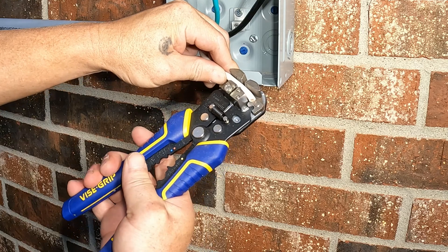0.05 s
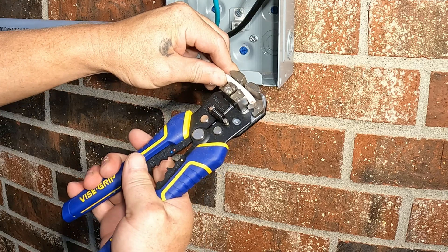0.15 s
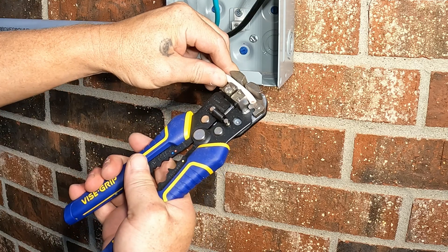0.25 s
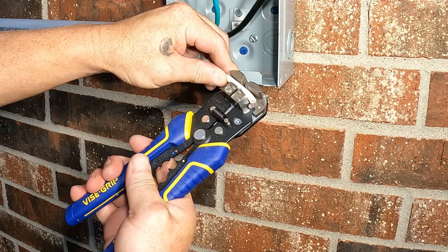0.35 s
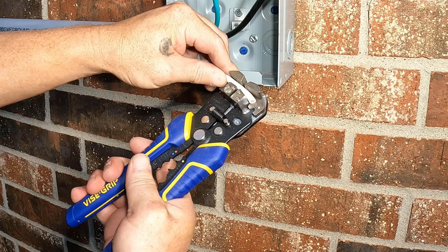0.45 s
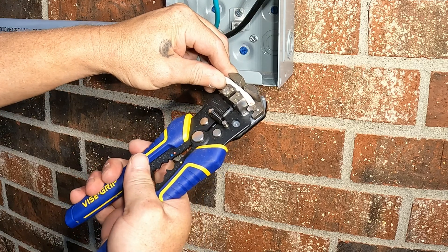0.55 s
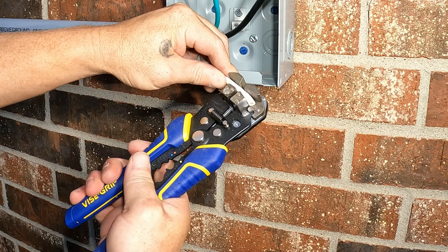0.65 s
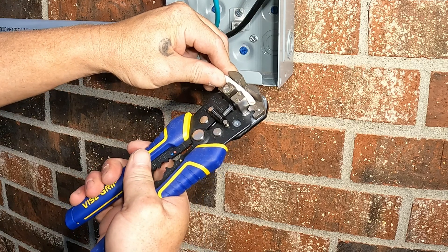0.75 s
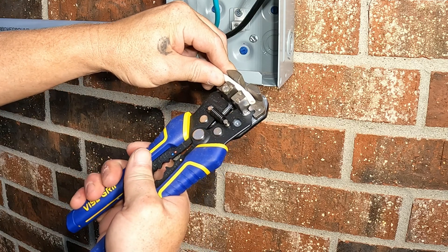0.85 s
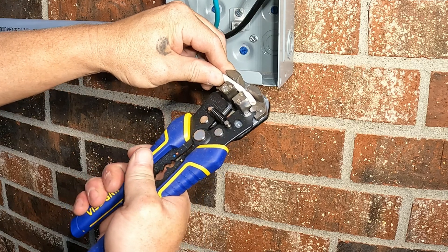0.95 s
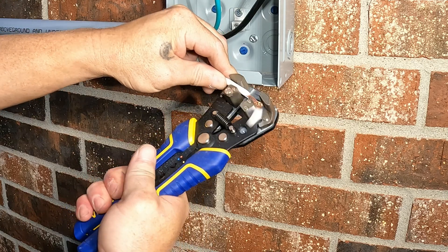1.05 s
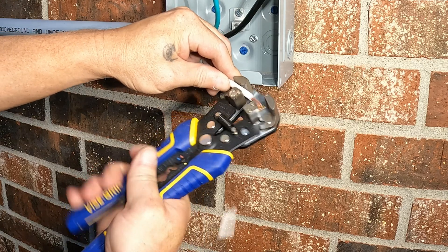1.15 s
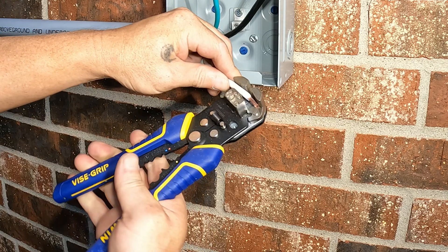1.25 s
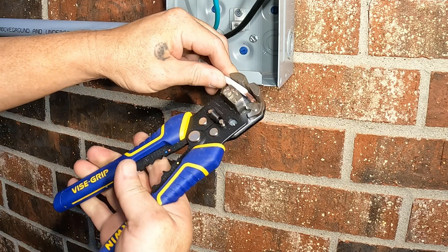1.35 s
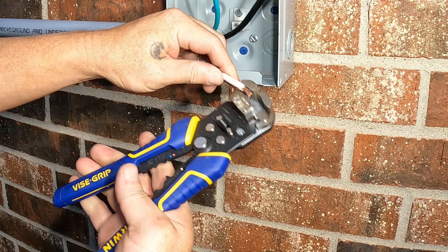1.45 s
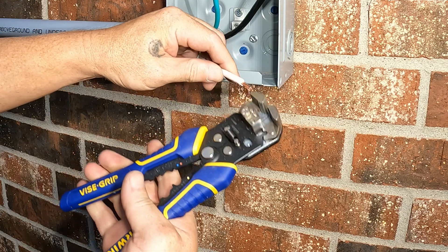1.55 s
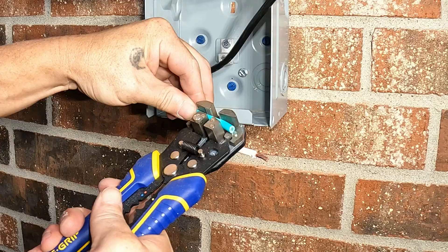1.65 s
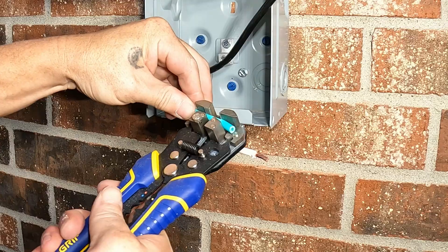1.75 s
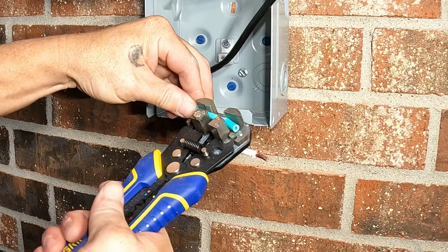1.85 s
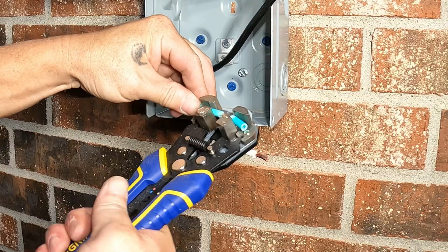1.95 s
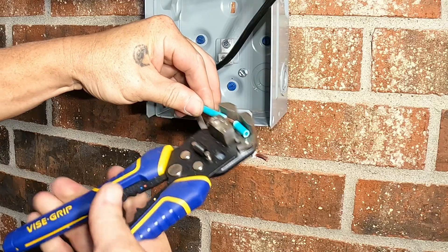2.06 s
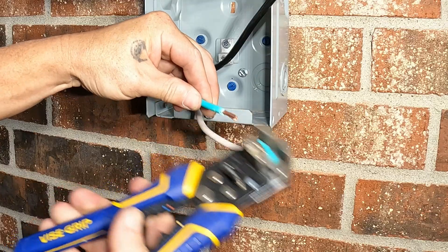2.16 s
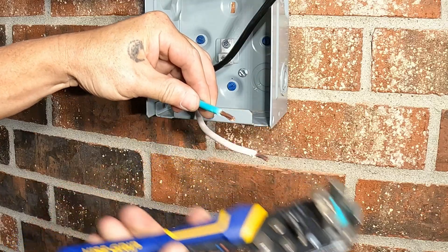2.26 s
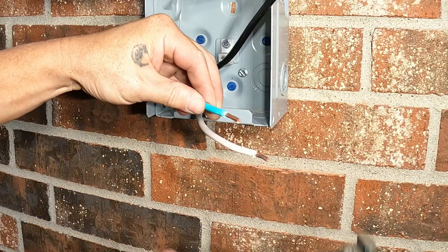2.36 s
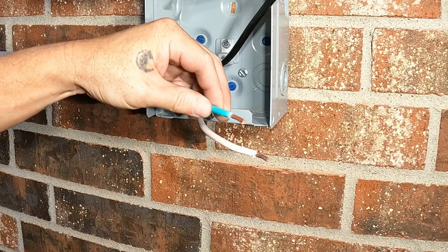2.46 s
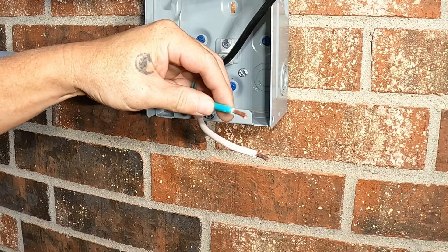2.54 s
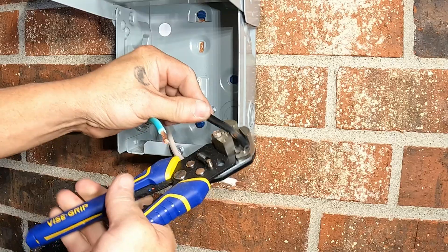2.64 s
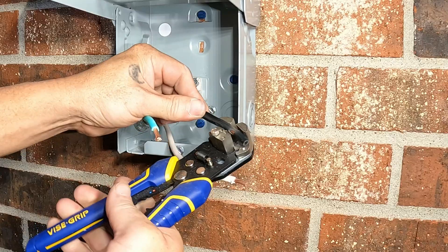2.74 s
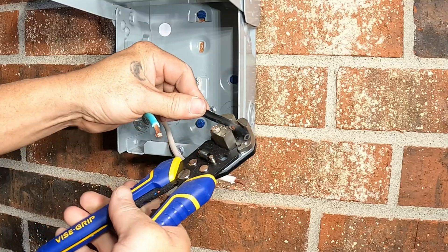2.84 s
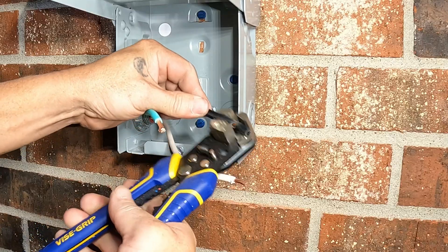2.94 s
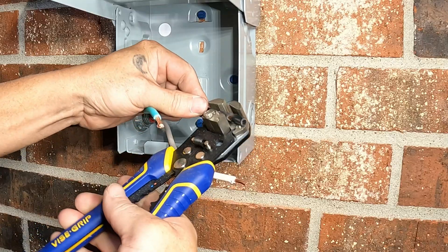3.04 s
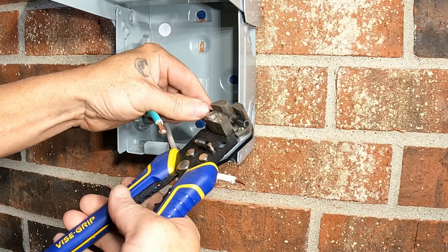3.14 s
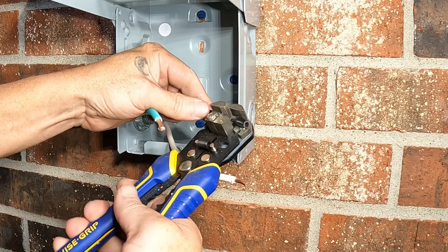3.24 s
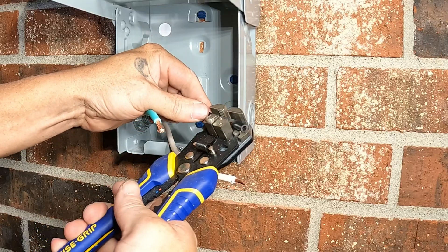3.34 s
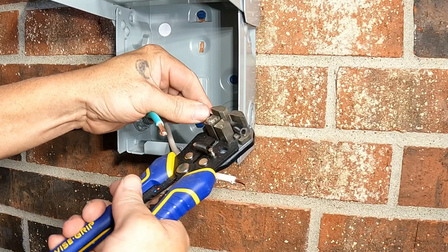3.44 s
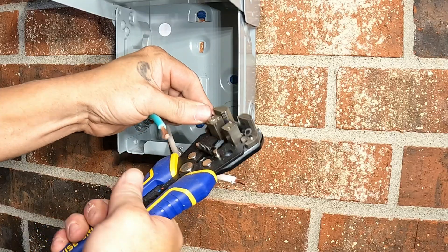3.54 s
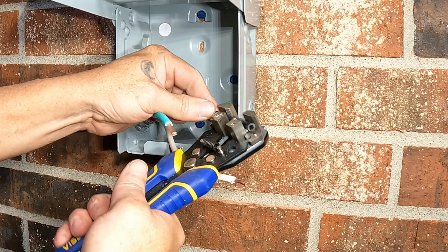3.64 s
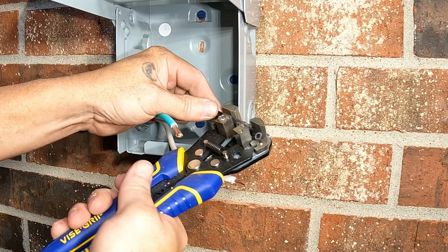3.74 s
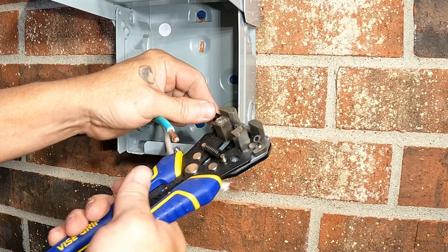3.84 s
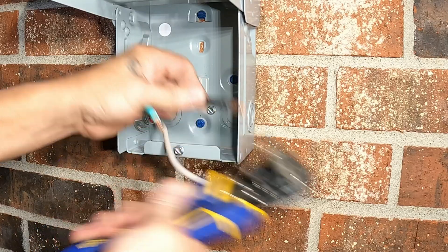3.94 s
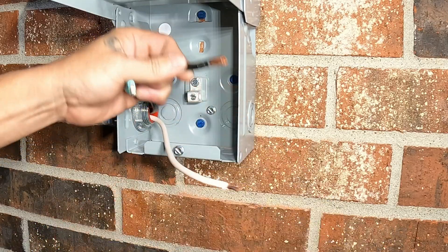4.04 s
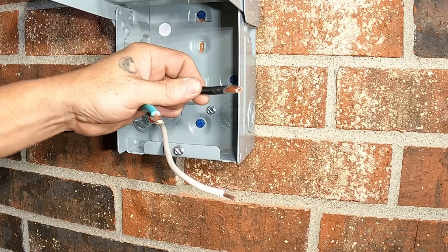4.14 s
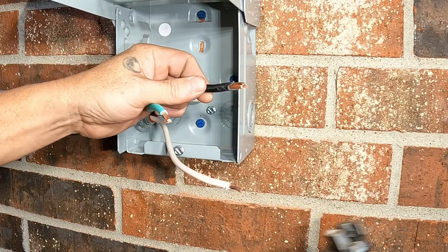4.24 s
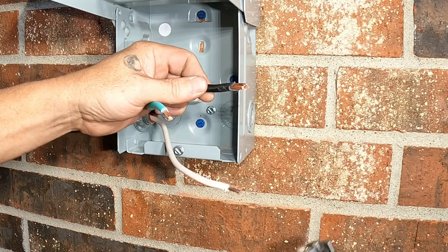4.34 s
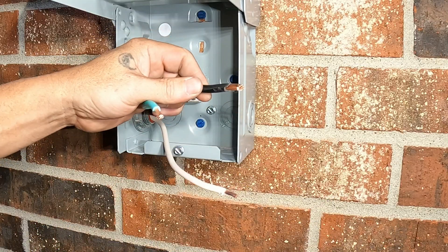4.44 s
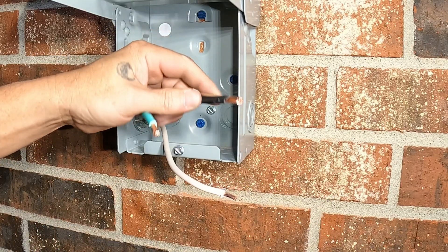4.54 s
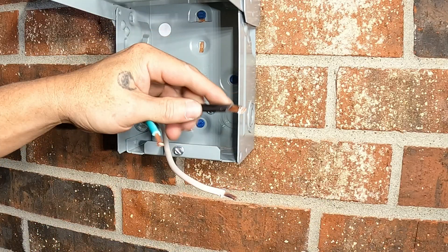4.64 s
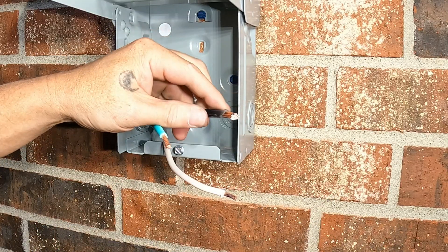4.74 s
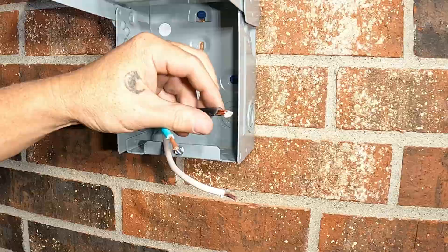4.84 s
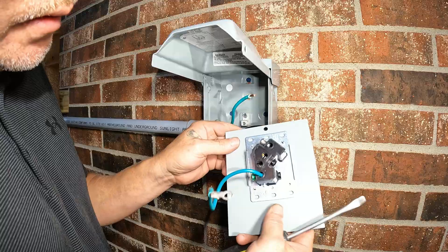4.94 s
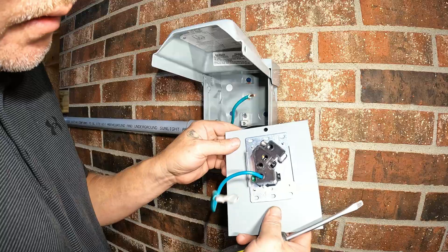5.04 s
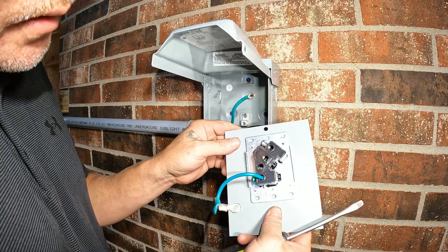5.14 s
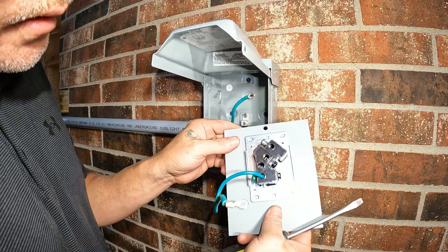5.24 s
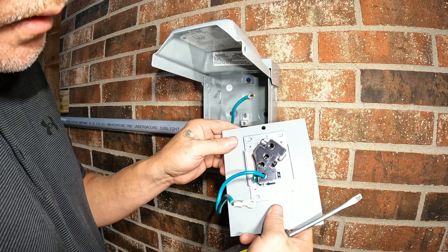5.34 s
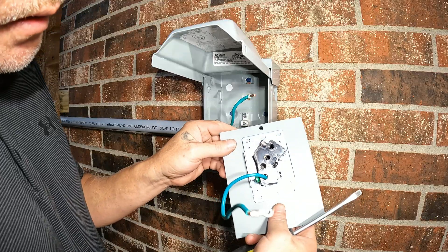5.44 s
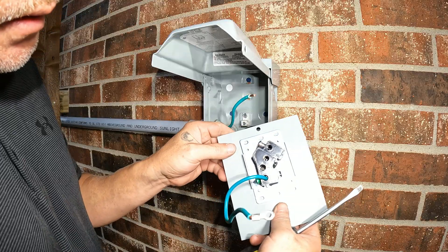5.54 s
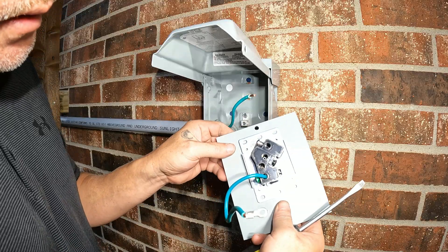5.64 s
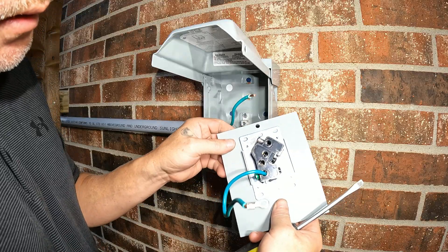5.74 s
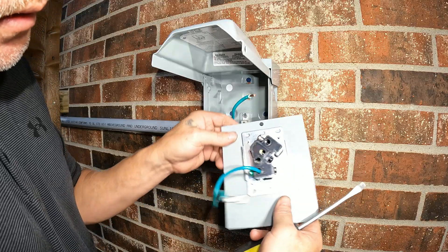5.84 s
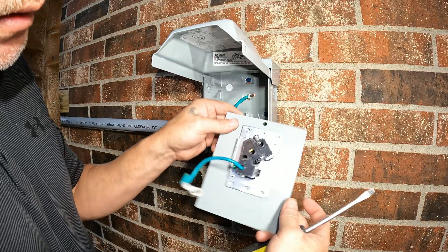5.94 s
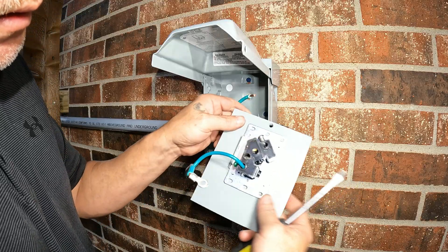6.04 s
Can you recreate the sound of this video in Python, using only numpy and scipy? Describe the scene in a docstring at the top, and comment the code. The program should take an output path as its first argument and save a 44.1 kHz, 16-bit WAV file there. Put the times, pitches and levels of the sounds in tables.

```python
"""Over low outdoor rumble and faint hiss, a wire stripper works close by at a steel box on a brick wall.
After a light click, two hard snaps and thumps tear insulation; after each, the sprung jaws clack and rattle.
Stiff wire knocks on the box and rubs; a third, much softer snap comes with a strong thump and thin whistle.
More clacks and knocks follow, then fingers rustle on the wire and a cover plate clinks.
Shaped noise makes the air, bursts ringing through resonances the blows, and sine waves the lasting tones."""
import sys
import numpy as np
from scipy import signal
from scipy.fft import rfft, irfft
from scipy.io import wavfile
from scipy.ndimage import uniform_filter1d

SR = 44100
rng = np.random.default_rng(int(sys.argv[2]) if len(sys.argv) > 2 else 0)


def master(y):
    """Save y as 16-bit WAV."""
    cut = np.clip(np.atleast_2d(y).T, -1, 1)
    pcm = np.round(cut * 32767)  # scale
    wavfile.write(sys.argv[1], SR, pcm.astype(np.int16))


N = 268701

# resonances of the free jaws, before each blow's bands are set: (f/Hz, width/Hz, level/dB)
FREE_JAWS = [(1330, 140, -6), (2130, 130, -9), (2620, 520, -4), (3530, 790, -8), (4912, 710, -1),
             (5930, 1900, 1), (6990, 520, 3), (8200, 270, -26), (10900, 2700, -16.5), (10833, 2700, -11.5)]


def amp(db):
    """Turns decibels into gain."""
    return 10 ** (np.asarray(db) / 20)


def evened(x):
    """Scales a sound to an average strength (rms) of 1."""
    return x / np.sqrt(np.mean(x ** 2) + 1e-20)


def read(points, hz):
    """Reads a table between its points, with frequency on a log axis."""
    f, value = np.transpose(points)
    return np.interp(np.log(hz + 1), np.log(f + 1), value)


def curve(rows):
    """Reads a table of times and values at every sample."""
    return np.interp(np.arange(N) / SR, *np.transpose(rows))


def add(mix, s, sound):
    """Mixes a sound in at time s, cutting off what runs past the end."""
    start = max(round(s * SR), 0)
    part = mix[..., start:][..., :sound.shape[-1]]
    part += sound[..., :part.shape[-1]]


def ring(x, modes):
    """Passes x through resonances side by side: the narrower one is, the longer it rings."""
    total = 0
    for hz, width, db in modes:
        b, a = signal.iirpeak(hz, hz / width, SR)
        total = total + amp(db) * signal.lfilter(b, a, x)
    return total


def pair(mid, side, side_db):
    """Makes left and right from a shared part and an opposed part."""
    opposed = amp(side_db) * side
    return np.array([mid + opposed, mid - opposed])


def noise(spectrum, side_db, top_hz):
    """Makes stereo noise of rms 1 with a given spectrum and a steep upper edge."""
    hz = np.fft.rfftfreq(N, 1 / SR)
    shape = amp(read(spectrum, hz)) / np.hypot(1, (hz / top_hz) ** 50)
    mid, side = irfft(rfft(rng.standard_normal((2, N))) * shape, N)
    return evened(pair(mid, side, side_db))


def slips(per_s):
    """Makes two random trains of tiny impacts."""
    return rng.standard_normal((2, N)) * (rng.random((2, N)) < per_s / SR)


def swell(s, hold_s, rise_db_per_s, fall_db_per_s):
    """Gives the gain of one stroke: it rises until time s, holds, and dies away."""
    t = np.arange(N) / SR - s
    rise_db = -rise_db_per_s * np.maximum(-t, 0)
    fall_db = -fall_db_per_s * np.maximum(t - hold_s, 0)
    return amp(rise_db + fall_db)


def voiced(x, levels_db):
    """Tilts a blow smoothly, in two passes, to bring its four bands close to the given strengths."""
    # edges of the bands thud, body, ring and top: (f/Hz)
    edges = np.array([400, 1600, 3400, 8200, 16000])
    centres = np.sqrt(edges[1:] * edges[:-1])
    z, hz = rfft(x), np.fft.rfftfreq(len(x), 1 / SR)
    for _ in range(2):
        energy = np.histogram(hz, edges, weights=abs(z) ** 2)[0]
        power = energy * 2 / (len(x) * .005 * SR)  # as if spread over 5 ms
        missing_db = levels_db - 10 * np.log10(power + 1e-20)
        z = z * amp(read(np.c_[centres, missing_db], hz))
    return irfft(z, len(x))


def blows(rows, modes, thud_db, top_db, crack_db, after_db, after_s, side_db, top_hz):
    """Makes each blow a brief clatter of tiny impacts that cracks and rings the metal."""
    thud_growth = .43  # dB of thud per dB of level: the thud grows slowly, so hard blows sound brighter
    out, t = np.zeros((2, N)), np.arange(-512, 3584) / SR
    hard = signal.butter(6, top_hz, fs=SR)
    soft = signal.butter(3, 8000, fs=SR)
    for s, db, body_db, clatter_ms in rows:
        impacts = rng.standard_normal((2, len(t))) * (t >= 0)
        # hard contact ends quickly; loose parts buzz on, duller
        fade = np.exp(-(1000 * t / clatter_ms / 1.5) ** 2)
        contact = signal.lfilter(*hard, impacts * fade)
        buzz = signal.lfilter(*soft, impacts * amp(after_db) * np.exp(-abs(t) / after_s))
        metal = ring(contact + buzz, modes) + amp(crack_db) * contact
        bands_db = np.array([thud_db + thud_growth * db, db + body_db, db, db + top_db])
        mid, side = [voiced(m, bands_db) for m in metal]
        add(out, s + t[0], pair(mid, side, side_db) * signal.windows.tukey(len(t), .2))
    return out


def hiss():
    """Makes the faint, even hiss of the microphone from noise."""
    return amp(-84) * noise([(100, 0.5), (10000, -0.5), (16000, -9)], side_db=-3, top_hz=13500)


def outdoors(rumble_db, air_db):
    """Makes a swelling low rumble under thin air noise whose level and colour change abruptly twice."""
    # rumble before rumble_db is added: (t/s, level/dB)
    rumble_level = [(0, -42), (1.5, -43.5), (1.97, -38), (2.27, -45.5), (2.8, -42.5), (3.3, -51),
                    (3.7, -42), (4.6, -47), (5.15, -38), (6.09, -39.5)]
    # relative spectrum of the rumble: (f/Hz, density/dB per Hz)
    rumble_spectrum = [(8.8, -38), (15, -5.5), (43, 1.5), (60, 3), (162, -11), (190, -14.5), (362, -23.5),
                       (432, -23), (541, -35.5), (596, -27.5), (700, -34), (910, -63.5), (1540, -120)]
    # air before air_db is added: (start/s, level/dB, relative spectrum as (f/Hz, density/dB per Hz))
    airs = [(0, -60.5, [(250, -18), (420, -3.5), (650, -16), (1150, -9), (1600, -15), (2400, -21.5),
            (4800, -22.5), (6500, -30), (8000, -33), (8700, -26), (9900, -29)]), (2.647, -62.5, [(250, -27),
            (420, -7.5), (850, -9.5), (1250, -7.5), (2000, -18.5), (3200, -17.5), (4000, -20),
            (5100, -13.5), (6200, -23.5), (8000, -27), (9900, -24.5)]), (4.985, -60, [(250, -22),
            (420, -9.5), (800, -12), (1400, -10), (2400, -20.5), (4000, -25), (5600, -20.5), (8000, -35.5),
            (9600, -28.5), (9900, -29.5)])]
    air, t = np.zeros((2, N)), np.arange(N) / SR
    for start, db, spectrum in airs:
        new_air = amp(db + air_db) * noise(spectrum, side_db=-4.5, top_hz=9950)
        air = np.where(t >= start, new_air, air)
    rumble = noise(rumble_spectrum, side_db=-20, top_hz=900)
    return air + amp(curve(rumble_level) + rumble_db) * rumble


def porch(x, wall_db, tail_db, far_db, far_s, far_width_s):
    """Scatters sound quickly off the brick wall, then adds a weak tail that swells as far walls answer."""
    # how long the tail takes to fall by 60 dB, apart from the swell: (f/Hz, t60/s)
    fall_times = [(300, .35), (1500, 0.36), (5000, 0.93), (8000, 0.12), (13000, .25)]
    t = np.arange(SR) / SR
    taps = rng.standard_normal((2, SR)) * (rng.random((2, SR)) < .1) * (t > .003)
    hz, age, z = signal.stft(taps, SR, nperseg=256)
    faded = z * amp(-60 * age / read(fall_times, hz)[:, None])
    tail = signal.istft(faded, SR)[1][:, :SR]
    tail = tail * (1 + amp(far_db) * np.exp(-((t - far_s) / far_width_s) ** 2))
    scatter = evened(taps * np.exp(-t / 0.013))
    echoes = amp(wall_db) * scatter + amp(tail_db) * evened(tail)
    return signal.fftconvolve(x, echoes / np.sqrt(SR), axes=1)[:, :N]


def fingers(grains_per_s):
    """Lets skin catch on the insulation in small dry grains of filtered noise."""
    # rustles on the wire: (full force at t/s, hold/s, level/dB)
    rustles = [(4.765, 0.081, -64), (5.03, .07, -61.5)]
    band = signal.butter(2, [900, 7000], "band", fs=SR)
    grains = signal.lfilter(*band, slips(grains_per_s))
    touch = np.zeros(N)
    for s, hold_s, db in rustles:
        touch += amp(db) * swell(s, hold_s, rise_db_per_s=119, fall_db_per_s=299.5)
    return touch * evened(pair(*grains, side_db=-9))


def plate():
    """Clinks the handled cover plate: small impacts ring its resonances."""
    # clinks: (t/s, level/dB, body relative to level/dB, clatter/ms before blows stretches it 1.5 times)
    clinks = [(5.085, -54.5, -17, 10.3), (5.986, -49, 6, 3.7), (6.0018, -36.5, 6.5, 2),
              (6.0105, -28.5, -4.5, 4.4), (6.019, -28.5, -24, 5.4)]
    # resonances of the plate, before each blow's bands are set: (f/Hz, width/Hz, level/dB)
    plate_modes = [(1428, 71, 7.5), (1680, 97, 1), (2055, 115, -9), (2520, 42.5, -8), (4220, 265, -17),
                   (4920, 350, -10.5), (6710, 230, 5), (7040, 99, 4)]
    return blows(clinks, plate_modes, thud_db=-27.5, top_db=-17, crack_db=-15, after_db=0,
                 after_s=0.011, side_db=-11, top_hz=12800)


def rub(slips_per_s):
    """Rubs strained wire in the box: dense uneven slips ring a few low resonances."""
    # strokes: (full force at t/s, hold/s, level/dB, level of the deep resonances/dB)
    rubs = [(3.099, 0.077, -54.5, -50.5), (3.355, 0.056, -39.5, -54)]
    # upper resonances, later scaled together: (f/Hz, width/Hz, level/dB)
    upper_modes = [(677, 102, 14.5), (841, 140, -19), (1210, 45, 11.5), (1334, 160, -22.5)]
    # deep resonances, later scaled together: (f/Hz, width/Hz, level/dB)
    deep_modes = [(431, 46, 7.5), (494, 110, -12.5)]
    band = signal.butter(3, [340, 1700], "band", fs=SR)
    force = signal.lfilter(*band, slips(slips_per_s))
    body, deep = evened(ring(force, upper_modes)), evened(ring(force, deep_modes))
    strokes = np.zeros((2, N))
    for s, hold_s, db, deep_db in rubs:
        gain = swell(s, hold_s, rise_db_per_s=334, fall_db_per_s=209)
        strokes += gain * (amp(db) * body + amp(deep_db) * deep)
    return pair(*strokes, side_db=-8.5)


def box(knock_db, scrape_s, rasp_db, top_hz):
    """Knocks and scrapes wire ends briefly on the sheet steel, weaker at each bounce."""
    # knocks: (t/s, level of the first contact before knock_db is added/dB, number of contacts)
    knocks = [(2.718, -38.5, 1), (2.741, -24.5, 2), (2.785, -27.5, 2), (3.688, -28, 1), (4.115, -17.5, 4),
              (4.244, -20, 3), (4.31, -26.5, 1)]
    # resonances of the steel box, later scaled together: (f/Hz, width/Hz, level/dB)
    box_modes = [(566.6, 73, 2.5), (675, 82, 2), (690, 210, -1.5), (970, 13, 4.5), (1230, 50, 10),
                 (1400, 44, -1), (1600, 59, -13.5), (2100, 430, -20.5), (2630, 300, -15), (2870, 380, -13)]
    bounce_s, bounce_loss_db = 0.018, 4
    out, t = np.zeros((2, N)), np.arange(SR // 4) / SR
    band = signal.butter(3, [420, top_hz], "band", fs=SR)
    for s, db, count in knocks:
        for k in range(count):
            force = rng.standard_normal((2, len(t))) * np.exp(-t / scrape_s)
            sheet = signal.lfilter(*band, ring(force, box_modes) + amp(rasp_db) * force)
            knock = pair(*sheet / abs(sheet).max(), side_db=-12.5)
            add(out, s + k * bounce_s, amp(db + knock_db - k * bounce_loss_db) * knock)
    return out


def whistle(level_db, overtones_db, waver):
    """Adds three wavering partials on one gliding pitch, in one arch, as the tool swings away."""
    # base pitch, itself unheard; the partials lie at 2, 3 and 4 times it: (t/s, f/Hz)
    glide = [(3.69, 2320), (3.75, 2700), (3.80, 2790), (3.86, 2480), (3.97, 2210)]
    t = np.arange(glide[0][0], glide[-1][0], 1 / SR)
    hz = np.interp(t, *np.transpose(glide))
    wander = evened(uniform_filter1d(rng.standard_normal(N), size=40))[:len(t)]
    turns = np.cumsum(hz * (1 + waver * wander)) / SR
    tone = sum(amp(db) * np.sin(2 * np.pi * k * turns) for k, db in enumerate(overtones_db, 2))
    arch = np.sin(np.linspace(0, np.pi, len(t)))
    out = np.zeros(N)
    add(out, t[0], amp(level_db) * arch * tone)
    return out


def spring(focus_db, damped_s):
    """Lets the jolted return spring sing in fading sines, most near one pitch, until moving jaws damp it."""
    # jolts: (t/s, level/dB before tone level and focus are added, favoured f/Hz, damped from t/s)
    twangs = [(1.193, -47.5, 3070, 1.54), (2.053, -47, 1800, 2.21), (3.764, -55, 3960, 4.0)]
    # tones of the spring, before it is damped: (f/Hz, relative level/dB, t60/s)
    spring_tones = [(1247, 0, .45), (1920, 0, 1.2), (2420, -6, .6), (2808, -1, .9), (3100, -7, .7),
                    (3478, -3, .35), (3720, -7, .5), (5600, -4, .3), (6282, 2, .5)]
    out, t = np.zeros(N), np.arange(SR) / SR
    for s, db, favoured_hz, until in twangs:
        held = np.exp(-np.maximum(s + t - until, 0) / damped_s)
        for hz, level, t60 in spring_tones:
            octaves_off = abs(np.log2(hz / favoured_hz))
            strength = amp(db + level + focus_db * octaves_off - 60 * t / t60)
            add(out, s, strength * held * np.sin(2 * np.pi * (hz * t + rng.random())))
    return out


def jaw_ring(clicks):
    """Draws thin lasting tones of the steel jaws out of their clicks with very narrow resonances."""
    # tones, before they are turned down below: (f/Hz, width/Hz, level/dB)
    thin_modes = [(3580, 9, -9), (4861, 7, -1), (5179, 5, -13), (6261, 12, -11), (7127, 9, -13),
                  (10220, 6, -3)]
    return amp(-11.5) * ring(clicks, thin_modes)


def handles(grip_hz, grip_s):
    """Jolts the handles in the hand: a heavily damped low swing and a short knock of the plastic grips."""
    # jolts: (t/s, level before the swing's onset and decay/dB, f/Hz, decay/ms, grip knock relative/dB)
    thumps = [(1.1925, -9, 118, 4.2, -13), (2.0517, -12, 113, 4.2, -6.5), (2.815, -15, 55.4, 9, -20.5),
              (3.692, -10.5, 110, 6.4, -23)]
    out, t = np.zeros(N), np.arange(SR // 10) / SR
    for s, db, hz, decay_ms, grip_db in thumps:
        age = 1000 * t / decay_ms
        swing = np.sin(2 * np.pi * hz * t) * np.exp(-age) * (1 - np.exp(-4 * age))
        grip = amp(grip_db) * np.sin(2 * np.pi * grip_hz * t) * np.exp(-t / grip_s)
        add(out, s, amp(db) * (grip - swing))
    return out


def linkage():
    """Clicks the linkage lightly as it catches, and ticks its loose parts unevenly as the jaws move."""
    # catches: (t/s, level/dB)
    catches = [(0.2298, -45), (1.314, -30.5), (1.3288, -34.5), (1.3438, -32.5), (1.3675, -30.5),
               (2.165, -29), (2.187, -28), (2.4442, -52), (2.7444, -39), (2.7631, -21), (3.115, -45.5),
               (3.313, -56), (3.354, -44.5), (3.3755, -34.5), (3.3887, -37), (3.763, -25), (4.1136, -29),
               (4.2327, -34), (4.2697, -22.5)]
    # ticking spells: (start/s, end/s, level before random spread/dB, mean gap/s)
    rattles = [(1.203, 1.221, -43, 0.0095), (1.3, 1.311, -49, 0.0055), (1.321, 1.36, -43, .014),
               (1.529, 1.65, -62, 0.047), (3.049, 3.221, -60, 0.057), (4.093, 4.146, -41.5, .014),
               (4.218, 4.229, -47, .006), (4.258, 4.271, -37, 0.0057), (4.54, 4.68, -63.5, 0.049)]
    # each row as blows reads it: time, level, relative body, clatter before stretching
    rows = [(s, db, -4, 2.6) for s, db in catches]
    for start, end, db, gap_s in rattles:
        for s in np.arange(start, end, gap_s):
            tick_s = s + gap_s * rng.random()
            tick_db = db - 2.5 * rng.standard_normal()
            rows.append((tick_s, tick_db, -1, 8.5))
    return blows(rows, FREE_JAWS, thud_db=-32.5, top_db=-17.5, crack_db=-12.5, after_db=-19.0,
                 after_s=.011, side_db=-9.5, top_hz=13400)


def jaws():
    """Slams the sprung jaws against their stop, which they strike once more on the rebound."""
    # slams: (t/s, level/dB, body relative to level/dB, clatter/ms before blows stretches it 1.5 times,
    # rebound relative to slam/dB)
    slams = [(1.4036, -16, -13, 1.6, -1.5), (2.1988, -19, -4, 2.2, -8.5), (2.2327, -15, -11, 2, -7.5),
             (2.7714, -16, -6, 3.95, -2), (2.813, -11.5, -14.5, 3.3, -3.5), (4.0852, -17, -14, 2.2, -14.5),
             (4.3236, -14.5, -3, 3.54, -1.5)]
    rebound_s, rebound_body_db, rebound_ms = 0.0042, -10, 2.8  # delay, relative body, unstretched clatter
    rows = [row[:4] for row in slams]
    for s, db, _, _, again_db in slams:
        rows.append((s + rebound_s, db + again_db, rebound_body_db, rebound_ms))
    return blows(rows, FREE_JAWS, thud_db=-31.5, top_db=-14, crack_db=-16, after_db=-24.5,
                 after_s=0.0089, side_db=-10.5, top_hz=12880)


def insulation():
    """Tears the insulation with a faint creak, a crack and then the snap, all ringing the clamped jaws."""
    # snaps: (t/s, level/dB, body relative to level/dB, clatter/ms before blows stretches it 1.5 times)
    snaps = [(1.191, -13.5, 2.5, 1), (2.0525, -11, -5, 1.4), (3.6915, -30, -10, 3.4)]
    # creak and crack ahead of each snap: (lead/s, level relative to snap/dB, clatter/ms before stretching)
    tears = [(.0105, -25.5, 9), (.0016, -8.5, 0.86)]
    # resonances of the jaws clamped on wire, before bands are set: (f/Hz, width/Hz, level/dB)
    loaded_jaws = [(1470, 180, -23), (1950, 160, -18), (2710, 270, 7.5), (3272, 87, -7.5), (4100, 170, -11),
                   (4600, 900, -6.5), (5720, 160, -5), (6900, 430, -8.5), (8300, 140, -23.5)]
    rows = list(snaps)
    for s, db, body_db, _ in snaps:
        for lead_s, tear_db, ms in tears:
            rows.append((s - lead_s, db + tear_db, body_db, ms))
    return blows(rows, loaded_jaws, thud_db=-25.0, top_db=-19.0, crack_db=-15, after_db=-33.0,
                 after_s=.005, side_db=-11.0, top_hz=13500)


def scene():
    """Puts the tool, the box and the plate against the wall, outdoors."""
    background = outdoors(rumble_db=2, air_db=3.0) + hiss() + fingers(grains_per_s=1200)
    clinks = plate()
    wire = box(knock_db=-0.5, scrape_s=0.014, rasp_db=-2.5, top_hz=3800) + rub(slips_per_s=1400)
    snaps, clicks = insulation(), jaws() + linkage()
    # the closed jaws send little of a snap's treble to the walls
    muffled = signal.lfilter(*signal.butter(4, 6500, fs=SR), snaps)
    thrown = amp(-9) * muffled + clicks + clinks + wire
    room = porch(thrown, wall_db=-14.0, tail_db=-33.5, far_db=3, far_s=0.084, far_width_s=.025)
    singing = spring(focus_db=-14, damped_s=0.018) + jaw_ring(clicks)
    swinging = whistle(level_db=-58.5, overtones_db=[-3, -11, -21], waver=0.011)
    tool = snaps + clicks + singing + handles(grip_hz=384, grip_s=0.0047) + swinging
    return tool + clinks + wire + room + background


def record(dry):
    """Clips anything beyond full scale, then cuts the highest treble."""
    clipped = np.clip(dry, -1, 1)
    low_pass = signal.firwin(255, 16300, window=("kaiser", 8), fs=SR)
    return signal.oaconvolve(clipped, low_pass[None], "same")


dry = scene()
out = record(dry)
master(out)
```